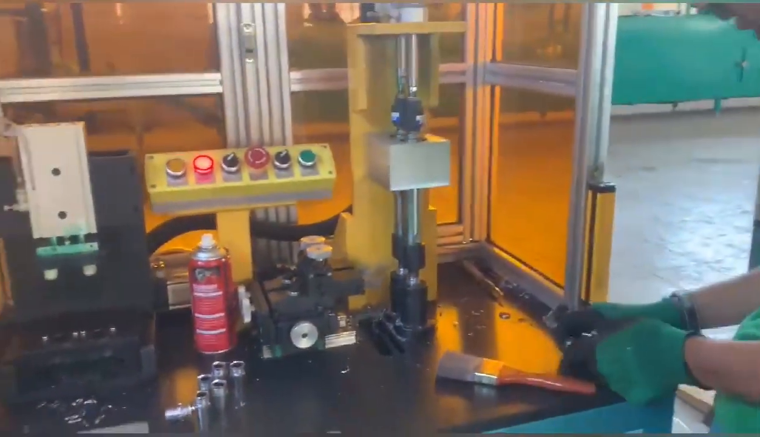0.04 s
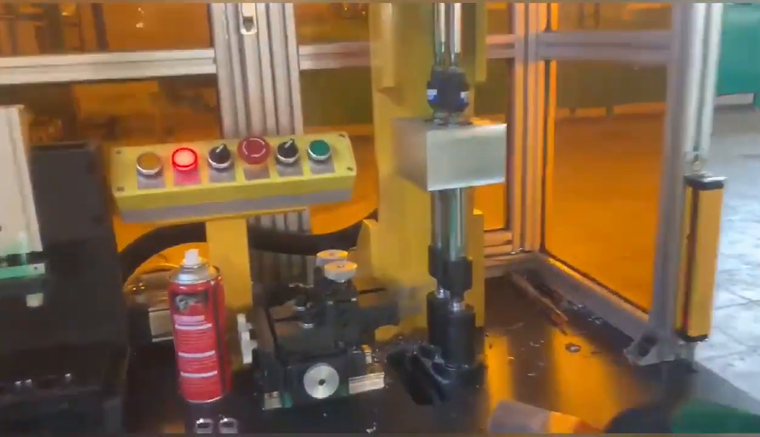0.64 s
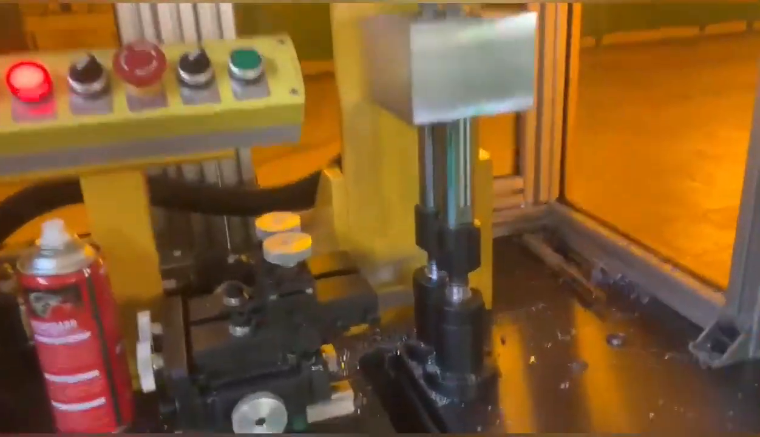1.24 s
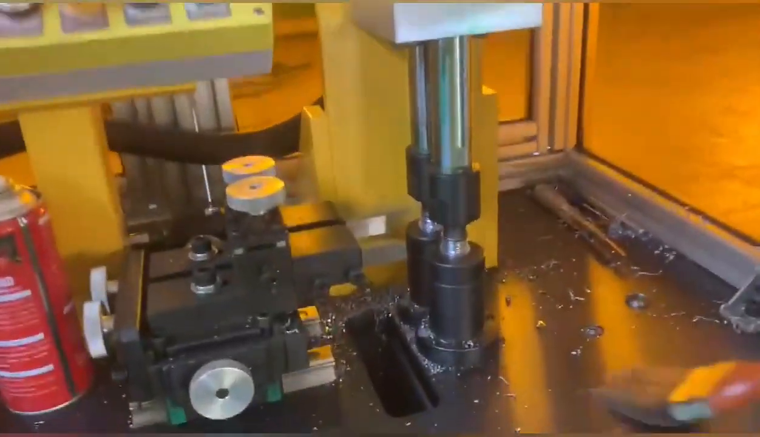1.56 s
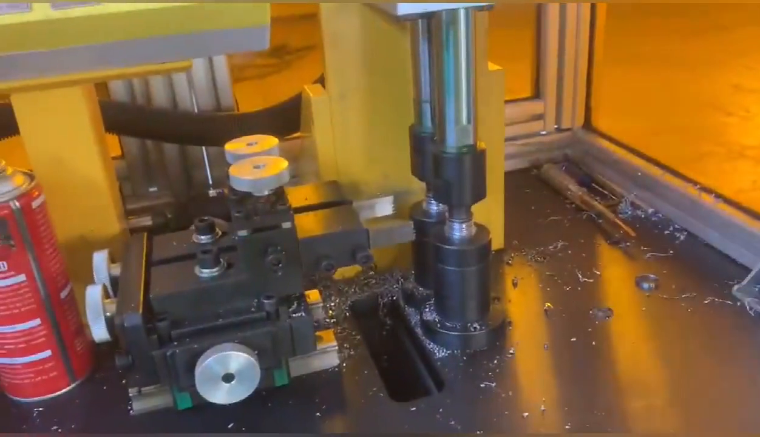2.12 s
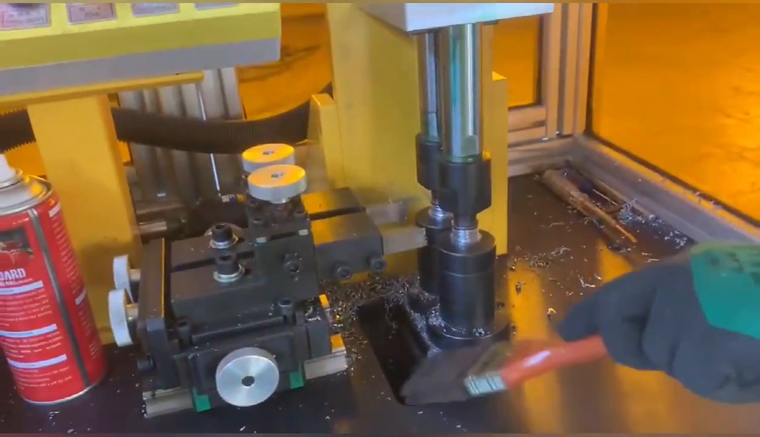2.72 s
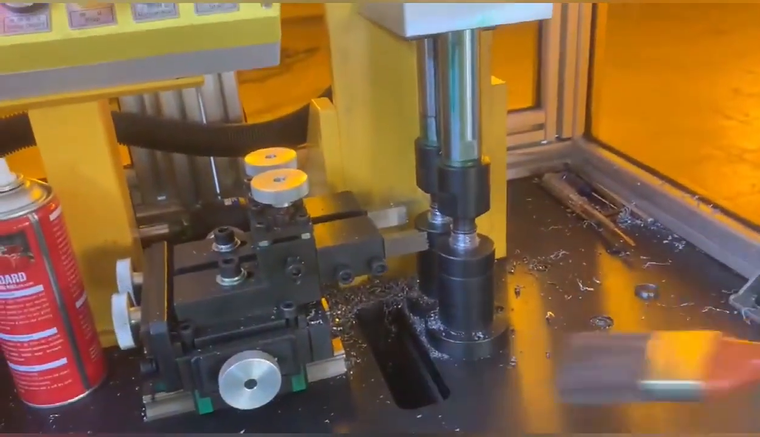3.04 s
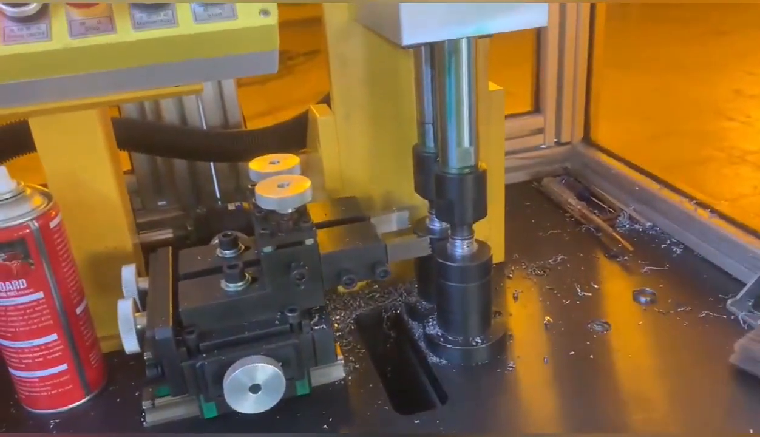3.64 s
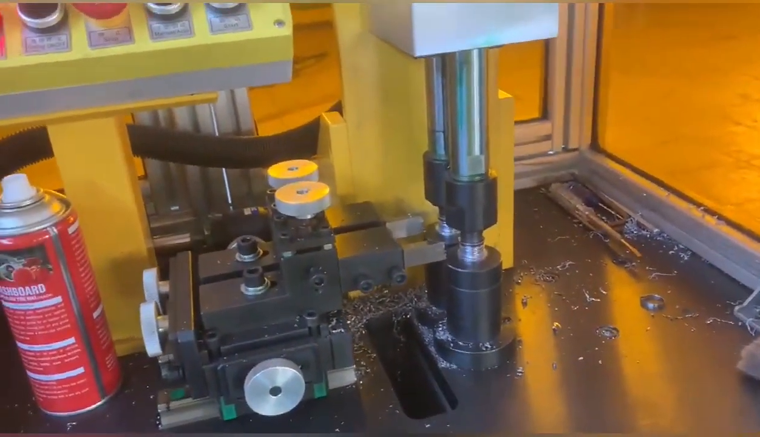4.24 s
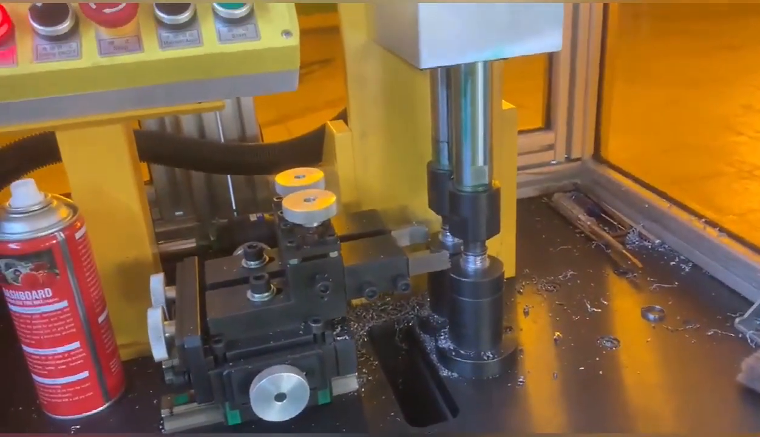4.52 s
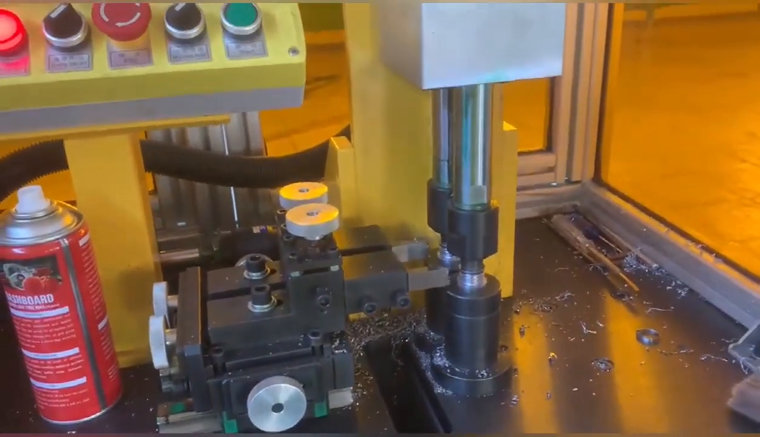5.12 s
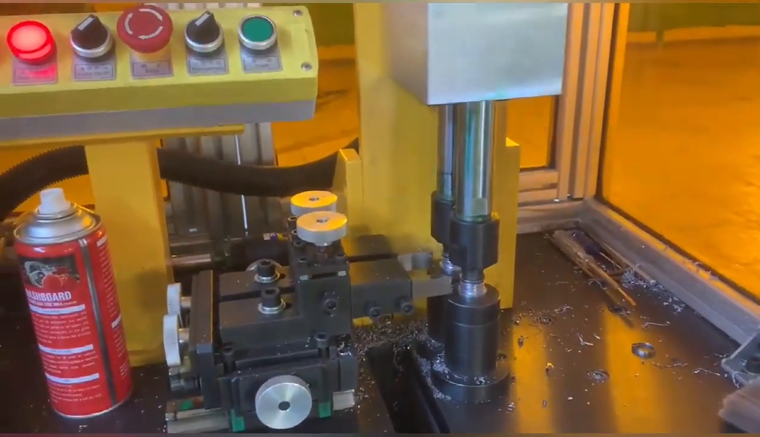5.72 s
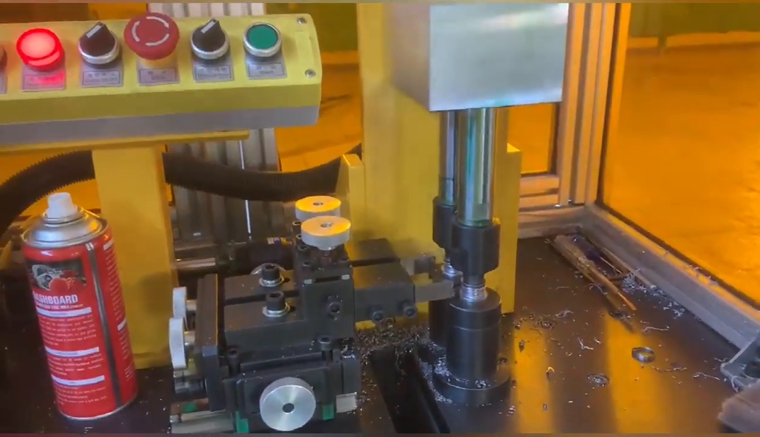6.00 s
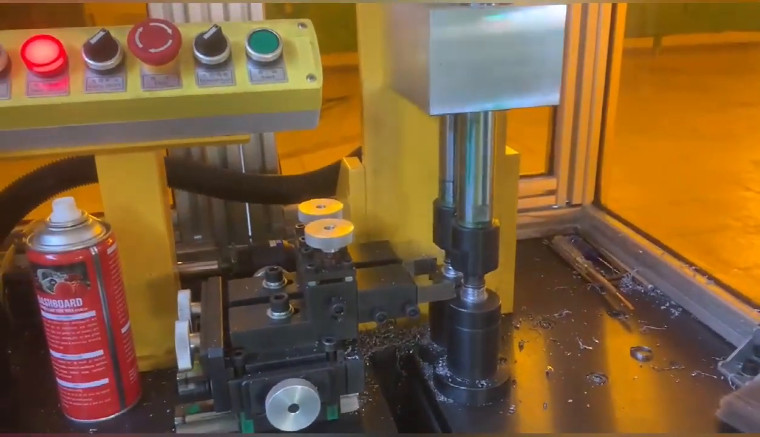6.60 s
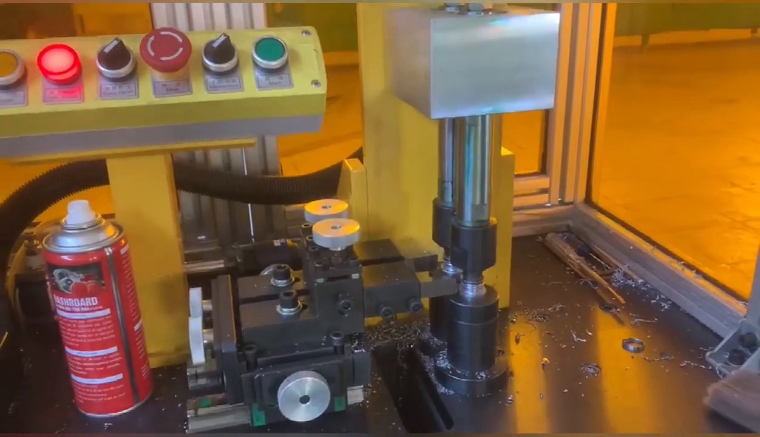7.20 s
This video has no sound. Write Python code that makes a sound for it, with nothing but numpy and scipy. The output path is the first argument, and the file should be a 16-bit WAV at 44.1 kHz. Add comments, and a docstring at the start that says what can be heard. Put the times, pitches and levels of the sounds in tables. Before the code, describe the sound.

The microphone moves in on a metal forming machine running in a rumbling factory hall, with a steady hum, a wavering whine and a fast, gritty rubbing of metal. Early on come heavy, booming knocks with soft clinks. The machine drones on through the grainy hiss of a brush on the tool and a short puff of air, then loose panels shake with a few softer knocks.

```python
"""In a rumbling workshop, a metal forming machine idles as the listener comes closer.
Its drive hums and whines, and its spindle (the turning shaft) rubs about ten times a second.
Heavy, dull knocks shake the frame and boom through the hall, and small metal parts clink.
A brush sweeps the turning tool, air hisses briefly, and near the end loose panels rattle."""
import sys
import numpy as np
from scipy import signal
from scipy.fft import rfft, irfft
from scipy.io import wavfile
from scipy.ndimage import uniform_filter1d

SR = 44100
rng = np.random.default_rng(int(sys.argv[2]) if len(sys.argv) > 2 else 0)


def pcm_store(signal):
    """Save signal as 16-bit PCM."""
    levels = np.round(np.clip(np.atleast_2d(signal), -1, 1) * 32767)
    wavfile.write(sys.argv[1], SR, levels.astype(np.int16).T)


N = 320166
TIME, FREQS_HZ = np.arange(N) / SR, np.fft.rfftfreq(N, 1 / SR)
TURNS_PER_S, FIRST_RUB_S = 10.31, 0.0957


def gain(db):
    """Turns decibels into a number to multiply a sound by."""
    return 10 ** (np.asarray(db) / 20)

def normalize(x):
    """Scales a signal to an average strength (rms) of 1."""
    return x / np.sqrt(np.mean(x ** 2) + 1e-20)

def curve(rows):
    """Joins a table's (time, value) points with straight lines."""
    rows = np.asarray(rows)
    return np.interp(TIME, rows[:, 0], rows[:, 1])

def add(mix, start_s, sound):
    """Adds a sound to the mix at its start time."""
    part = mix[max(round(start_s * SR), 0):][:len(sound)]
    part += sound[:len(part)]

def noise(colour):
    """Noise with a colour: a table of how strong each pitch is."""
    hz, db = np.transpose(colour)
    shape = gain(np.interp(np.log(FREQS_HZ + 1), np.log(hz), db))
    return normalize(irfft(rfft(rng.standard_normal(N)) * shape, N))

def wander(rate_hz):
    """A smooth random wobble; a higher rate makes it quicker."""
    return normalize(irfft(rfft(rng.standard_normal(N)) * np.exp(-(FREQS_HZ / rate_hz) ** 2), N))

def shimmer(x, depth_db):
    """Lets narrow bands of a noise swell and fade, each by itself."""
    bands = signal.stft(x, nperseg=1024)[2]
    patches = uniform_filter1d(rng.standard_normal(bands.shape), size=4, axis=0)
    patches = uniform_filter1d(patches, size=6, axis=1)
    return normalize(signal.istft(bands * gain(depth_db * normalize(patches)))[1][:N])

def singing(notes, waver_db, rate_hz):
    """Noisy ringing notes, each catching and letting go by itself."""
    out = np.zeros(N)
    for hz, width, db in notes:
        band = irfft(rfft(rng.standard_normal(N)) / (1 + 1j * (FREQS_HZ - hz) / width) ** 2, N)
        out += gain(db) * normalize(band) * gain(waver_db * wander(rate_hz))
    return normalize(out)

def turns(lag_s=0.):
    """Counts the spindle's turns; whole numbers fall on the hardest rubs."""
    return (TIME - FIRST_RUB_S - lag_s) * TURNS_PER_S

def turn_load():
    """How hard the spindle presses: a new random value for every turn."""
    marks = np.arange(-1, turns()[-1] + 1)
    return np.interp(turns(), marks, normalize(rng.standard_normal(len(marks))))

# Rubbing through one turn: share_of_turn, rub_db, scrape_db
ONE_TURN = [(0, 2.5, 8.5), (.12, 2.5, 5.5), (.3, -2.3, 5), (.45, -2, 2), (.62, -0.7, 6), (.74, 0.2, 8),
            (.86, 2.5, 6)]
def turn_db(scrape=False, lag_s=0.):
    """The rise and fall of the rub, or of the scrape, with each turn."""
    share, rub_db, scrape_db = np.transpose(ONE_TURN)
    return np.interp(turns(lag_s), share, scrape_db if scrape else rub_db, period=1)

# The listener's approach: time_s, level_db
APPROACH = [(0, -6.5), (.5, -7.5), (1.0, -8), (1.6, -4.5)]
def nearness_db():
    """Sounds grow louder as the listener comes closer."""
    return curve(APPROACH)

# Colour of the hall's rumble: pitch_hz, level_db
HALL_COLOUR = [(15, -44), (30, -6), (46, 3.5), (100, 0), (135, 2), (215, -7), (300, -2.5), (380, -7),
               (500, -5.5), (620, -11), (950, -8.5), (1200, -20), (1430, -17.5), (1560, -78), (3000, -51.5)]
# Its loudness: time_s, level_db
RUMBLE_LEVEL = [(0, -33.5), (.8, -34.5), (1.4, -34), (1.7, -29), (2.5, -30), (2.8, -32), (3.5, -33.5),
                (4.5, -34), (5.5, -32.5), (6.3, -33.5), (6.45, -32.5), (6.8, -35), (7.05, -33.5),
                (7.26, -33.5)]
def hall_rumble(split_hz=650):
    """The hall rumbles, shaken a little by the spindle; its upper part grows on coming closer."""
    rumble = shimmer(noise(HALL_COLOUR), depth_db=1.8)
    low = irfft(rfft(rumble) / (1 + (FREQS_HZ / split_hz) ** 4), N)
    high = (rumble - low) * gain(nearness_db())
    return (low + high) * gain(curve(RUMBLE_LEVEL) + 0.47 * wander(30) + 0.13 * turn_db(lag_s=0.005))

# The drive's steady tones: pitch_hz, level_db
HUM_TONES = [(70, -38.5), (149.8, -37.5), (172.3, -42.5), (198, -53), (261, -49), (298.5, -44.5),
             (320.5, -43), (349, -48), (401, -45), (445, -46), (547, -50.5), (673, -72), (1046, -83),
             (1163, -54), (12300, -99)]
def drive_hum(waver_db=0.1):
    """The drive hums with slightly wavering tones, louder from close by."""
    tones = np.zeros(N)
    for hz, db in HUM_TONES:
        level = gain(db + waver_db * wander(2.2))
        tones += level * np.sin(2 * np.pi * (hz * TIME + rng.random()) + 0.37 * wander(9.1))
    return np.sqrt(2) * tones * gain(0.76 * nearness_db())

# The whine swelling and sinking: time_s, level_db
WHINE_LEVEL = [(0, -60), (.5, -55), (.65, -44), (.97, -44.5), (1.3, -48), (2.2, -45), (3.6, -47.5),
               (3.95, -39), (4.6, -54.5), (5.1, -42), (5.6, -51), (6.2, -52), (6.85, -41), (7.26, -51)]
def drive_whine(pitch_hz=871, beats_per_s=3.04, first_dip_s=0.135, waver_db=1.5):
    """An unsteady tone pulses as a weaker twin, just below it, drifts in and out of step."""
    phase = 2 * np.pi * pitch_hz * TIME + 0.77 * wander(14)
    twin = 0.26 * np.sin(phase - 2 * np.pi * beats_per_s * (TIME - first_dip_s))
    level_db = curve(WHINE_LEVEL) + waver_db * wander(6.3) + 0.11 * turn_db()
    return normalize(np.sin(phase) - twin) * gain(level_db)

# Notes the casing rings at: pitch_hz, width_hz, near_db, far_db
CASING_NOTES = [(320, 41, 1, 2), (445.3, 25, -4.5, -6), (523, 31, -0.5, -7), (723.3, 46.7, 4, 0),
                (769.6, 25, -6, 3.5), (868, 20, -4, -1), (1000, 60, -18, -2), (1049, 46, -0.5, -10),
                (1120, 68, -7.5, -25), (1173, 58, -22.5, -7), (1304, 58, -11.5, -5.5),
                (1405, 27, -10.5, -11)]
# Loudness of its drone: time_s, level_db
DRONE_LEVEL = [(0, -46), (.25, -40.5), (.7, -38), (1.1, -33.5), (1.7, -32.5), (2.2, -33.5), (3.9, -33.5),
               (5.7, -33.5), (6.1, -35.5), (6.45, -31), (7.26, -36)]
def casing_drone(load, load_db=2.55, arrive_s=1.43, move_s=0.13):
    """The spindle shakes the casing once a turn; the blend of notes shifts on coming closer."""
    shaking = rfft(rng.standard_normal(N) * gain(1.42 * turn_db(lag_s=0.00066) + 0.73 * wander(25)))
    near_shape = far_shape = 0
    for hz, width, near_db, far_db in CASING_NOTES:
        peak = 1 / np.sqrt(width) / (1 + 1j * (FREQS_HZ - hz) / (0.68 * width)) ** 2
        near_shape += gain(near_db) * peak
        far_shape += gain(far_db) * peak
    near = normalize(irfft(shaking * near_shape, N))
    far = normalize(irfft(shaking * far_shape, N))
    closeness = .5 + .5 * np.tanh((TIME - arrive_s) / move_s)
    return (far + closeness * (near - far)) * gain(curve(DRONE_LEVEL) + load_db * load - 3)

# Colours of the bright rub and the dull scrape: pitch_hz, level_db
RUB_COLOUR = [(4500, -56), (6000, -39), (7500, -16), (8200, 7), (8700, -2.5), (9300, -6), (10100, -12),
              (10800, -12), (11700, -13.5), (12300, -23.5), (13200, -57)]
SCRAPE_COLOUR = [(900, -12.5), (1500, 7), (2200, -4), (2700, -10), (3100, -4.5), (3650, -3), (4200, -8.5),
                 (4600, -10.5), (5200, -11), (6200, -13), (8000, -18), (12000, -56)]
# High and low notes of the rubbed steel tool: pitch_hz, width_hz, level_db
TOOL_HIGH_NOTES = [(8100, 93, -1), (8720, 70, -1), (8850, 65, -4.5), (9600, 60, -17), (10060, 50, -11),
                   (10360, 50, -10), (11040, 80, -17)]
TOOL_LOW_NOTES = [(1870, 64, -2.5), (2070, 60, -1), (2225, 27, -2.5), (2390, 50, -3), (2883, 45, -6),
                  (3487, 46, -2), (3750, 48, -1), (4140, 54, -7), (4550, 60, -8.5)]
# Loudness of the rub and the scrape: time_s, level_db
RUB_LEVEL = [(0, -50), (1.2, -48), (2.15, -49), (2.32, -44), (2.5, -48), (4.4, -48), (5.15, -47),
             (5.23, -46), (5.33, -45.5), (5.42, -47.5), (5.8, -47.5), (6.5, -47), (7.26, -47.5)]
SCRAPE_LEVEL = [(0, -62), (.3, -59), (.8, -56.5), (1.4, -55.5), (2.6, -55.5), (3.4, -55.3), (4.3, -55.5),
                (5.0, -55), (5.7, -54.5), (6.4, -54.5), (7.26, -55.5)]
def spindle_rub(load, uneven_db=0.5, grit_db=0.6):
    """Metal rubs on metal: each turn, a dull scrape leads into a gritty chuff. Both ring the tool."""
    pressure_db = uneven_db * wander(22) - grit_db * wander(400)
    bright = shimmer(noise(RUB_COLOUR), depth_db=1.8)
    bright += gain(-5) * singing(TOOL_HIGH_NOTES, waver_db=2, rate_hz=8)
    dull = shimmer(noise(SCRAPE_COLOUR), depth_db=4.6)
    dull += gain(-3) * singing(TOOL_LOW_NOTES, waver_db=2.5, rate_hz=10)
    rub = normalize(bright * gain(0.92 * turn_db() + pressure_db))
    scrape = normalize(dull * gain(0.93 * turn_db(scrape=True) + 0.52 * pressure_db))
    return rub * gain(curve(RUB_LEVEL) - 0.2 * load) + scrape * gain(curve(SCRAPE_LEVEL) + 0.4 * load)

# Blows on the frame: start_s, level_db, pitch_hz, swell_s, boom_db
BLOWS = [(.744, -28, 869, .002, -41), (1.484, -13.5, 362, 0.0048, -22), (1.524, -19, 350, 0.0064, -28),
         (1.567, -23, 390, .012, -23.5), (1.612, -20, 295, 0.0087, -28), (1.676, -11.5, 327, 0.0016, -18),
         (1.724, -19.5, 690, 0.0074, -19), (1.737, -12, 523, .0065, -21), (1.745, -17, 66, 0.011, -24),
         (1.748, -11.5, 320, 0.004, -21), (1.76, -16, 302, 0.00455, -26), (1.951, -17.5, 404, 0.007, -17.5),
         (1.968, -16, 160, 0.0045, -16.5), (1.975, -10.5, 335, 0.0039, -17), (1.987, -22, 790, 0.0022, -33),
         (1.999, -8.5, 375, 0.0021, -16), (2.0082, -2.5, 115, 0.0014, -28), (2.016, -14, 520, .002, -29),
         (2.023, -22, 70, 0.0033, -31), (2.038, -12, 175, 0.0025, -25), (2.066, -14.5, 150, 0.0071, -35),
         (2.095, -17, 115, 0.0079, -22), (2.184, -17.5, 493, 0.0059, -23),
         (2.197, -13, 80.5, 0.0064, -26.5), (2.211, -17, 535, 0.0019, -33),
         (2.242, -23.5, 148, 0.0096, -37), (2.298, -15.5, 72.4, 0.011, -22.5),
         (2.359, -13.5, 514, 0.0013, -20.5), (2.371, -19, 288, 0.0051, -29.5),
         (2.408, -14.5, 300, 0.0071, -39), (3.571, -17.5, 450, 0.00071, -45),
         (4.954, -24.5, 324, 0.011, -52), (5.224, -24, 783, 0.0006, -41), (5.32, -23, 406, 0.0017, -52),
         (6.179, -30, 716, 0.0012, -49), (6.38, -22, 685, 0.0039, -32), (6.417, -20, 690, 0.006, -26.5),
         (6.465, -25, 697, 0.0089, -44), (6.575, -26.5, 710, 0.0017, -33), (6.598, -22, 328, 0.0061, -25),
         (6.65, -24, 290, 0.0081, -32.5), (6.797, -29, 180, 0.01, -48)]
# Colour of the boom after a blow: pitch_hz, level_db
BOOM_COLOUR = [(20, -17), (55, -11), (95, -7.5), (150, 1.5), (215, -2.5), (320, 1.5), (370, -3.5), (470, 3),
               (620, -5.5), (800, -18), (1200, -24), (1700, -51), (4000, -81), (9000, -77)]
# Notes of the frame: pitch_hz, level_db, fade_s (the time to fade by 60 dB)
FRAME_NOTES = [(153.4, -0.5, 0.33), (263, -0.5, 1), (299, 3, 0.051), (410.8, 4, 1), (478, -7, 0.35),
               (514, -1, 0.91), (670, -4.5, 0.15), (717, -1.5, 0.11), (870, -26, 0.6)]
def knocks(boom_fade_s=0.39, boom_rise_s=0.012):
    """Each blow is a short, dull pulse; loose parts boom after it and set the frame ringing."""
    t = np.arange(SR) / SR
    blows, boom_power = np.zeros(N), np.zeros(N)
    for start_s, db, hz, swell_s, boom_db in BLOWS:
        pulse = (t / swell_s) ** 2 * np.exp(2 - 2 * t / swell_s)
        add(blows, start_s, gain(db) * pulse * np.cos(2 * np.pi * hz * (t - swell_s)))
        tail = gain(boom_db - 60 * t / boom_fade_s) * (1 - np.exp(-t / boom_rise_s))
        add(boom_power, start_s, tail ** 2)
    boom = noise(BOOM_COLOUR) * np.sqrt(boom_power)
    frame = sum(gain(db - 60 * t / fade_s) / np.sqrt(fade_s) * np.sin(2 * np.pi * hz * t)
                for hz, db, fade_s in FRAME_NOTES)
    shaking = rng.standard_normal(N) * np.sqrt(boom_power)
    ring = normalize(signal.fftconvolve(shaking, frame)[:N]) * np.std(boom)
    return blows + gain(-1) * boom + gain(-4) * ring

# Parts that ring on: start_s, level_db, pitch_hz, length_s
PART_RINGS = [(1.54, -20.5, 305.3, 0.15), (1.56, -19, 419, 0.096), (1.637, -25, 722, 0.051),
              (1.677, -36.5, 1448, 0.11), (1.681, -31.5, 1002, 0.3), (1.685, -51, 3790, 0.036),
              (1.715, -48, 4484, 0.044), (1.747, -46.5, 3720, 0.048), (1.75, -29, 479, 0.11),
              (1.764, -21, 297, 0.079), (1.996, -12, 478.5, 0.063), (1.999, -21, 421.2, 0.15),
              (2.01, -16.5, 151, 0.15), (2.15, -29, 149.2, 0.4), (2.045, -29.5, 261.1, 1.4),
              (2.11, -41, 1340, 0.072), (2.245, -36.5, 1460, .05), (2.796, -43.5, 2870, 0.039),
              (6.38, -32, 713, 0.22), (6.509, -46, 1300, 0.36), (6.769, -40, 1300, 0.16)]
def ringing_parts(rise_s=0.0055):
    """After a blow or a touch, a metal part holds one fading note."""
    t, out = np.arange(SR) / SR, np.zeros(N)
    for start_s, db, hz, length_s in PART_RINGS:
        loudness = gain(db) * (1 - np.exp(-t / rise_s)) * np.maximum(1 - t / length_s, 0)
        add(out, start_s, loudness * np.sin(2 * np.pi * hz * t))
    return out

# Clinks of small parts: start_s, level_db, fade_s, pitch_hz
CLINKS = [(1.674, -39, 0.098, 6270), (1.718, -34.5, 0.06, 4500), (1.735, -42, 0.091, 2005),
          (1.97, -36, 0.03, 4430), (1.977, -37.5, 0.062, 1450), (2.21, -41, 0.05, 4440),
          (2.32, -45.5, 0.34, 4600), (3.057, -39, 0.071, 9900)]
# Colour of their tick: pitch_hz, level_db
TICK_COLOUR = [(600, -14), (1400, 16), (2400, 5.5), (3200, -10), (4400, 3), (5300, 3), (6300, -8),
               (8500, 13), (12000, -16), (13500, -23)]
def clinks(flutter_hz=420, rise_s=0.0016):
    """Loose metal clinks softly: a tick of noise with a rough note in it."""
    t, out = np.arange(SR) / SR, np.zeros(N)
    tick, flutter = noise(TICK_COLOUR), wander(flutter_hz)
    for start_s, db, fade_s, hz in CLINKS:
        clink = tick + gain(-7) * flutter * np.sin(2 * np.pi * hz * TIME)
        loudness = gain(db - 60 * t / fade_s) * (1 - np.exp(-t / rise_s))
        add(out, start_s, clink[round(start_s * SR):][:SR] * loudness)
    return out

# The heaviest blow's wave through the steel: start_s, level_db, first_hz, last_hz, length_s
CHIRPS = [(1.97, -31.5, 1874, 870, 0.0238)]
def steel_chirp():
    """The blow begins with a quick falling chirp, as high notes travel faster through steel."""
    out = np.zeros(N)
    for start_s, db, first_hz, last_hz, length_s in CHIRPS:
        progress = np.arange(0, length_s, 1 / SR) / length_s
        phase = 2 * np.pi * np.cumsum(first_hz * (last_hz / first_hz) ** progress) / SR
        add(out, start_s, gain(db) * 2 * progress * np.sin(np.pi * progress) * np.sin(phase))
    return out

# The crack where the heaviest blow lands: start_s, level_db, fade_s
CRACKS = [(1.972, -31.5, .022)]
# Its colour: pitch_hz, level_db
CRACK_COLOUR = [(700, -12), (1500, 16), (2600, -3), (4400, -3), (6000, -9), (8200, 4), (11000, -3),
                (13300, -12)]
def crack(rise_s=0.0004):
    """Steel meets steel in a very short, bright burst."""
    t, out = np.arange(SR // 4) / SR, np.zeros(N)
    burst = noise(CRACK_COLOUR)[:len(t)]
    for start_s, db, fade_s in CRACKS:
        add(out, start_s, burst * gain(db - 60 * t / fade_s) * (1 - np.exp(-t / rise_s)))
    return out

# The brush's sweep over the tool: time_s, level_db
BRUSH_LEVEL = [(2.55, -100), (2.64, -67), (2.675, -43.5), (2.72, -41.5), (2.82, -44.5), (2.89, -42),
               (2.94, -50.5), (3.02, -51), (3.08, -45.5), (3.2, -62.5), (3.3, -100)]
# Colour of its hiss: pitch_hz, level_db
BRUSH_COLOUR = [(1500, -50), (3500, -15.5), (4500, -12), (5300, -15), (6300, -21), (8000, -3.5),
                (8400, -1.5), (9200, -4), (9750, -2), (10100, -5), (10500, -10), (11600, -14), (12400, -24),
                (13300, -40)]
# Notes of its bristles: pitch_hz, width_hz, level_db
BRISTLE_NOTES = [(8100, 110, 3), (8580, 56, 1), (9200, 90, -5), (9250, 70, -6), (10180, 100, -4)]
def brush(grit_db=1.0):
    """Bristles catch and slip in a fine, grainy hiss with a thin whistle in it."""
    hiss = shimmer(noise(BRUSH_COLOUR), depth_db=4)
    whistle = gain(1) * singing(BRISTLE_NOTES, waver_db=1.5, rate_hz=14)
    return normalize(hiss + whistle) * gain(curve(BRUSH_LEVEL) + grit_db * wander(250))

# A puff of air: time_s, level_db, brightness_db_per_octave
AIR_PUFF = [(4.55, -100, 2), (4.64, -52, 12), (4.66, -39, 10), (4.76, -42, 0), (4.86, -40, -7),
            (4.95, -42, 1), (5.05, -50, -4), (5.15, -100, 0)]
# Colour of its hiss: pitch_hz, level_db
AIR_COLOUR = [(1500, -60), (3500, -25), (4500, -27), (5300, -20), (6300, -28.5), (8000, -8), (8250, 5),
              (8450, -7), (8700, -1.5), (9300, -8.5), (10300, -12.5), (11600, -21.5), (12400, -34),
              (13300, -41)]
# Notes of the nozzle: pitch_hz, width_hz, level_db
NOZZLE_NOTES = [(8300, 38, -3), (8490, 100, 1.5), (9300, 95, -8)]
def air_jet(grit_db=2.0, tilt_above_hz=8450):
    """A jet of air spits brightly, then narrows to its whistle."""
    hiss = shimmer(noise(AIR_COLOUR), depth_db=0.5)
    whistle = gain(-2) * singing(NOZZLE_NOTES, waver_db=4.5, rate_hz=13)
    hz, t, bands = signal.stft(normalize(hiss + whistle), SR, nperseg=256)
    time_s, _, brightness = np.transpose(AIR_PUFF)
    octaves_above = np.log2(np.maximum(hz / tilt_above_hz, 1))[:, None]
    jet = signal.istft(bands * gain(octaves_above * np.interp(t, time_s, brightness)))[1][:N]
    return jet * gain(curve(AIR_PUFF) - grit_db * wander(250))

# Loose panels shaking: time_s, level_db
RATTLE_LEVEL = [(6.3, -77), (6.38, -35), (6.44, -38), (6.55, -41), (6.64, -35), (6.8, -34.5), (7.0, -32),
                (7.15, -55), (7.26, -70)]
# Notes of the panels: pitch_hz, level_db, fade_s
PANEL_NOTES = [(131, -2.5, .2), (148.4, 0.5, 0.39), (226, 1, 0.11), (280, 1.5, 0.11), (331, -6, 0.2),
               (447, -11.5, 0.26), (714, -11, 0.15), (1280, -14, 0.2)]
def panel_rattle(taps_per_s=130, spread_db=3):
    """Many light, uneven taps keep loose panels rumbling."""
    t = np.arange(SR // 2) / SR
    taps = (rng.random(N) < taps_per_s / SR) * gain(spread_db * rng.standard_normal(N))
    taps *= np.sign(rng.standard_normal(N))  # each tap pushes or pulls
    ring = sum(gain(db - 60 * t / fade_s) * np.sin(2 * np.pi * hz * t) for hz, db, fade_s in PANEL_NOTES)
    return normalize(signal.fftconvolve(taps, ring)[:N]) * gain(curve(RATTLE_LEVEL))

# Where the sound is hollowed out: time_s, pitch_hz
HOLLOW_PITCH = [(0, 1450), (1.15, 1480), (1.55, 1580), (1.72, 1780), (1.9, 1660), (2.5, 1600), (7.26, 1560)]
def hollow(x, depth=0.7, width_hz=130):
    """One narrow band of pitches is weakened; it slides as the listener moves."""
    spin = np.exp(2j * np.pi * np.cumsum(curve(HOLLOW_PITCH)) / SR)
    smoothing = np.exp(-np.pi * width_hz / SR)
    # Shift the band down to 0 Hz, smooth away the rest, then shift it back.
    band = spin * signal.filtfilt([1 - smoothing], [1, -smoothing], x / spin, padtype=None)
    return x - depth * 2 * band.real

def scene():
    """Mixes everything into one channel; a harder turn mainly makes the casing louder."""
    load = turn_load()
    idling = drive_hum() + drive_whine() + casing_drone(load) + spindle_rub(load)
    impacts = knocks() + crack() + steel_chirp() + panel_rattle() + ringing_parts()
    return hollow(idling + impacts + hall_rumble() + clinks() + brush() + air_jet())[None]

def record(dry, low_cut_hz=21, high_cut_hz=13300):
    """Cuts a few deep dips into the sound, then trims its lowest and highest pitches."""
    dips = [(1430, 83, -3.5), (2750, 91, -16.5), (5094, 500, -14.5)]  # pitch_hz, width_hz, level_db
    dips_db = sum(db * np.exp(-((FREQS_HZ - hz) / width) ** 2) for hz, width, db in dips)
    gap_db = np.interp(FREQS_HZ, [6500, 6850, 7050, 7700, 7950, 8010], [0, -10, -42, -48, -28, 0])
    low_cut = FREQS_HZ ** 2 / np.hypot(FREQS_HZ ** 2, low_cut_hz ** 2)
    shaped = irfft(rfft(dry) * gain(dips_db + gap_db) * low_cut, N)
    high_cut = signal.firwin(511, high_cut_hz, window=("kaiser", 9), fs=SR)
    return signal.oaconvolve(shaped, high_cut[None], "same")


dry = scene()
out = record(dry)
pcm_store(out)
```